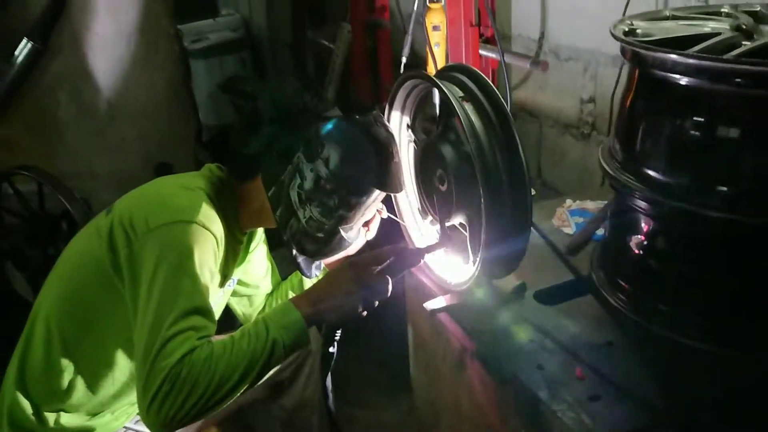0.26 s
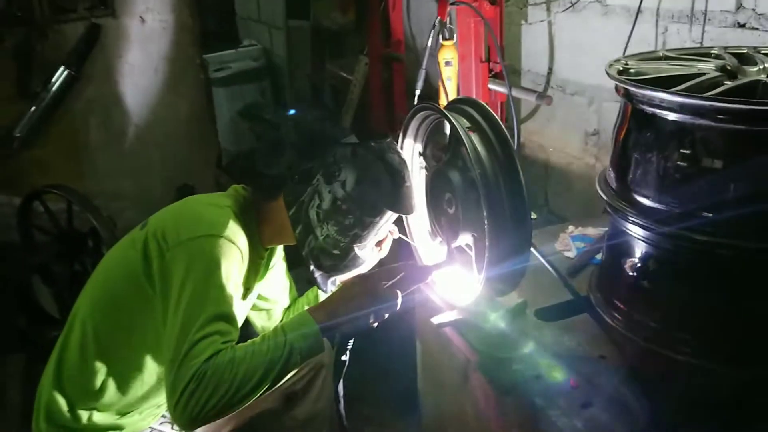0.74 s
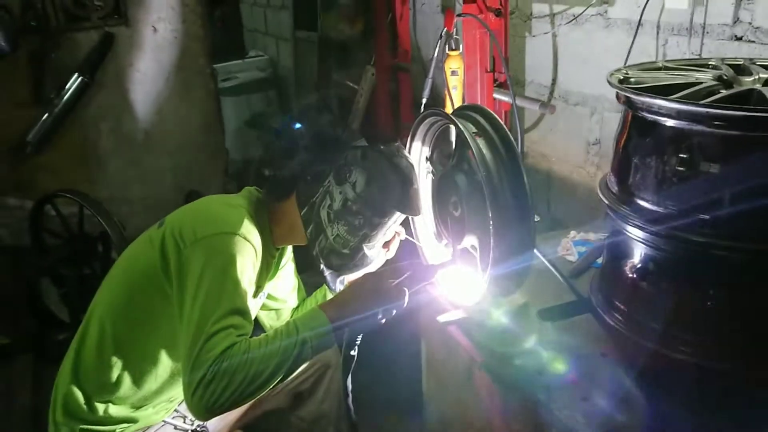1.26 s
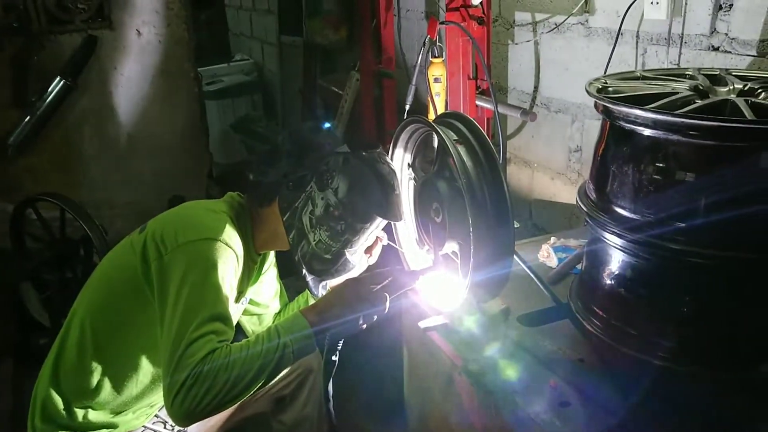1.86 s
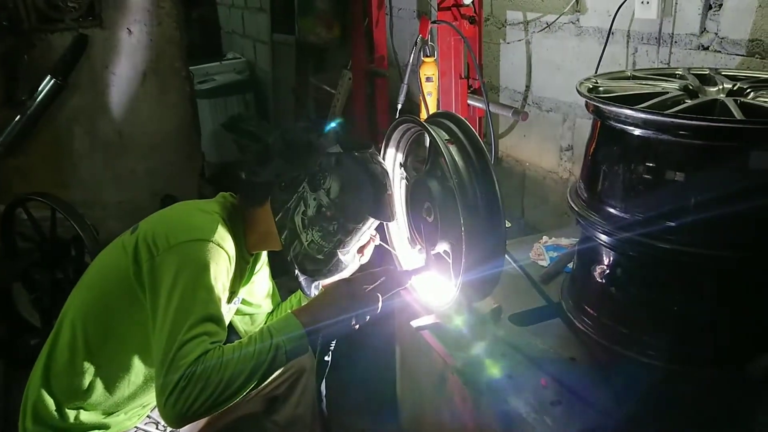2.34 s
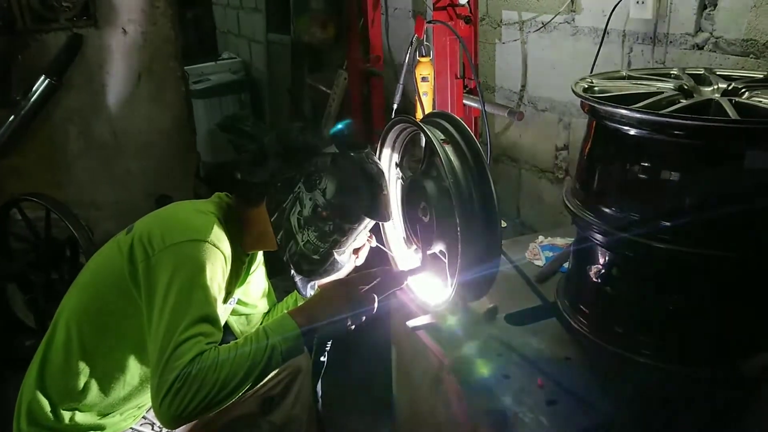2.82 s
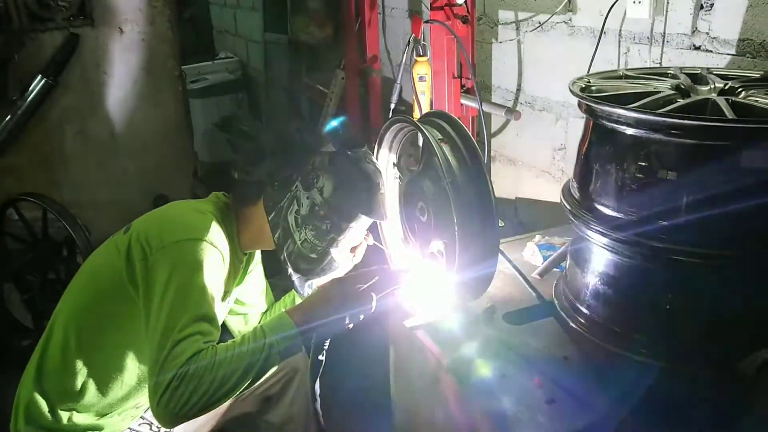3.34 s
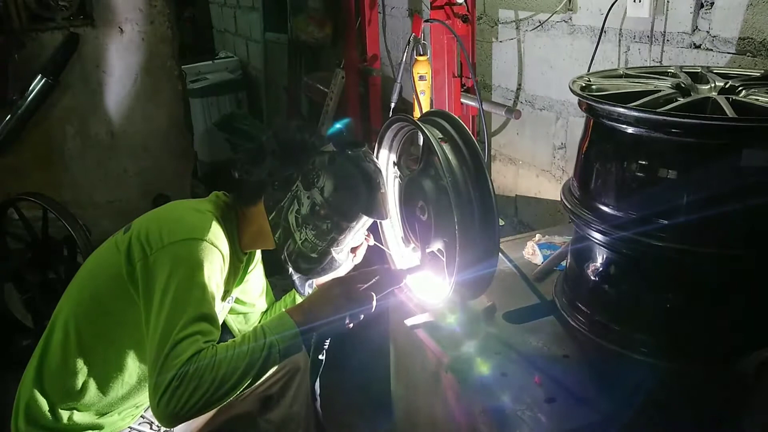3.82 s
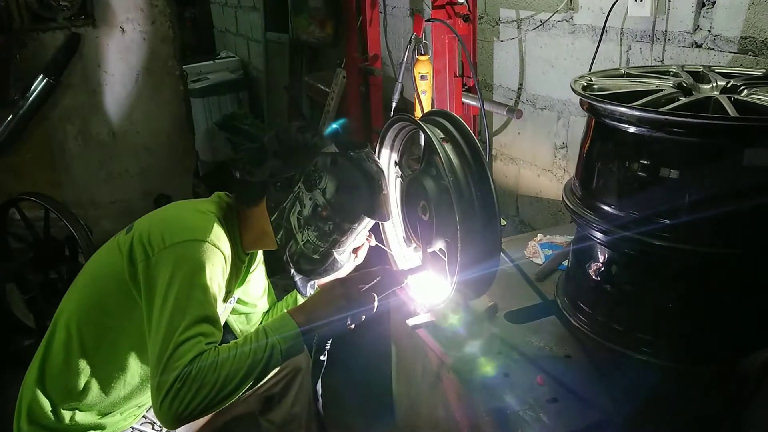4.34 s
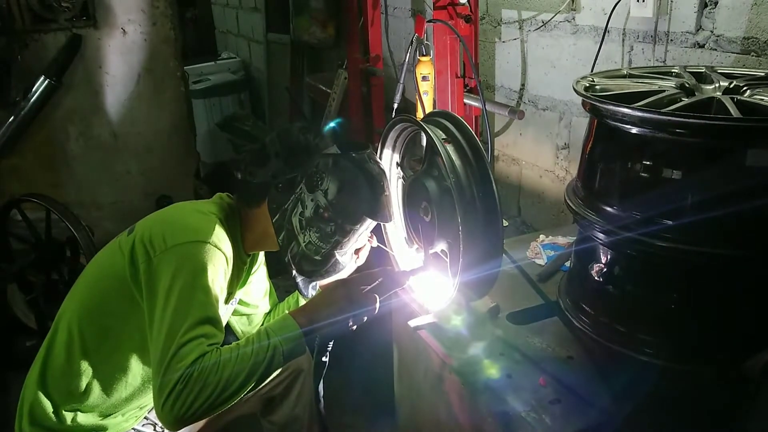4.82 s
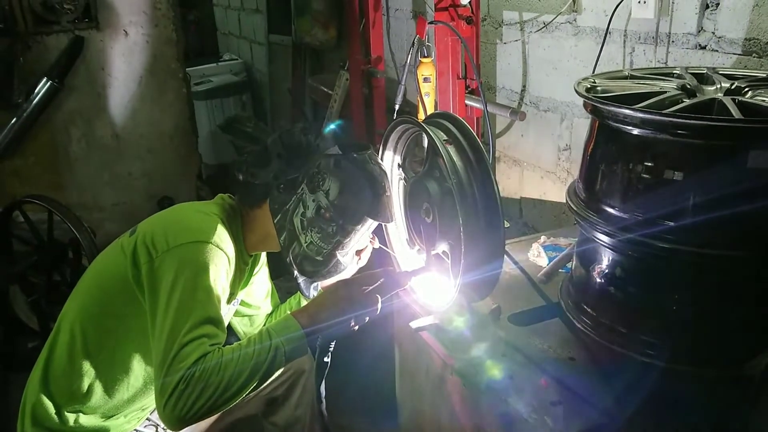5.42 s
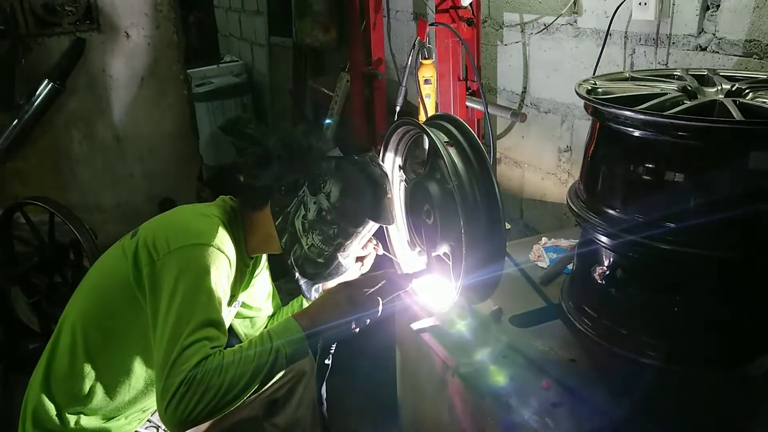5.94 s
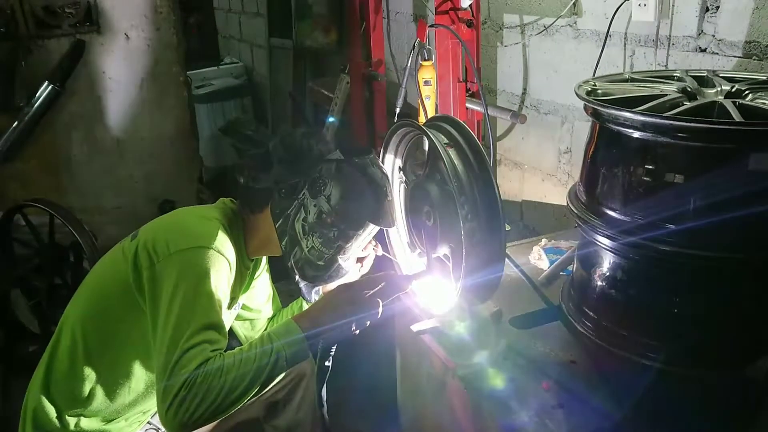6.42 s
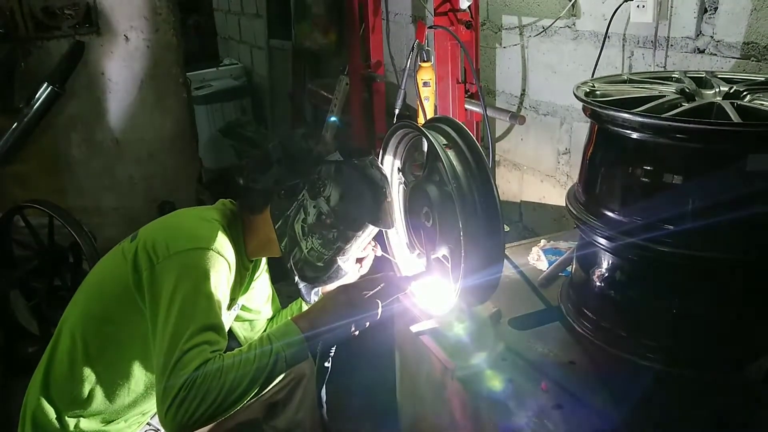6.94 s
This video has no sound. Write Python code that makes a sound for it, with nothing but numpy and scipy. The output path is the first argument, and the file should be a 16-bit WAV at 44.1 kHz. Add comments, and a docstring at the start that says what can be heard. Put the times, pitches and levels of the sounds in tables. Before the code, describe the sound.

Continuous bright electric buzz and gas hiss from welding a wheel rim, interrupted once by a tool clacking down, over low distant engine rumble.

```python
"""A concrete workshop: an alternating-current arc welds a wheel rim, heard on a two-port microphone.
The arc snaps twice in every current cycle; rim and walls turn the snaps into a comb of steady harmonics,
different at each ear, under a hiss of gas and plasma. The microphone is still being moved at first, so
the echo pattern shifts before it settles. Dull knocks on floor and bench; a steel tool, put down once, rings.
Traffic rumbles outside, as noise and engine tones, and a fan hums as narrow bands of noise."""
import sys
import numpy as np
from scipy import signal
from scipy.fft import rfft, irfft, next_fast_len
from scipy.io import wavfile
from scipy.ndimage import uniform_filter1d

SR = 44100
rng = np.random.default_rng(int(sys.argv[2]) if len(sys.argv) > 2 else 0)


def dump(signal):
    """Clip the signal to [-1, 1] and save it as 16-bit WAV at the path in sys.argv[1]."""
    limited = np.clip(np.atleast_2d(signal).T, -1, 1)
    pcm = np.round(limited * 32767).astype(np.int16)
    wavfile.write(sys.argv[1], SR, pcm)


N = 316197

# Arc: current frequency, and the share of a cycle between its two zero crossings
ARC_HZ, SECOND_SNAP = 65.121, .4546
# How the weld burns. Each row: time in seconds, arc gain in dB, hiss level in dB rms.
WELD_LEVELS = [(0, 1, -20), (.55, 1.5, -18), (.8, 7, -12.5), (1.2, 3, -15), (2, 4, -15), (3.1, 0.5, -15.5),
               (3.7, 2.5, -14.5), (3.85, 0.5, -15.5), (4.05, 2.5, -13), (4.5, 0.5, -17), (5.9, 3, -13.5),
               (7.17, 4, -12)]
# Harmonics that rim and walls reinforce.
# Each row: multiple of the arc frequency, left level in dB rms, right level in dB rms, before the arc gain.
STRONG_HARMONICS = [(18, -40, -50), (19, -44, -41), (20, -47, -30), (22, -30, -41), (24, -30, -30),
                    (26, -36, -27), (27, -39, -27), (28, -43, -31), (29, -38, -31), (30, -32, -38),
                    (31, -33, -38), (33, -29, -28), (34, -48, -33), (35, -43, -29), (36, -37, -32),
                    (37, -46, -22), (38, -41, -25), (39, -31, -26), (40, -39, -26), (41, -50, -32),
                    (42, -40, -30), (44, -46, -30), (46, -29, -29), (47, -37, -36), (48, -45, -32),
                    (49, -45, -34), (50, -32, -41), (51, -34, -35), (52, -42, -35), (53, -23, -30),
                    (55, -40, -30), (57, -35, -33), (58, -36, -44), (59, -36, -33), (60, -37, -26),
                    (61, -46, -27), (62, -29, -34), (63, -36, -32), (64, -24, -21), (66, -25, -27),
                    (68, -26, -26), (69, -42, -36), (70, -23, -28), (71, -31, -27), (72, -31, -22),
                    (73, -33, -28), (74, -36, -27), (75, -23, -18), (76, -37, -31), (77, -33, -18),
                    (79, -23, -33), (81, -34, -35), (82, -22, -34), (83, -27, -49), (84, -26, -34),
                    (85, -32, -37), (86, -30, -38), (87, -32, -52), (88, -29, -43), (90, -28, -38),
                    (91, -35, -40), (92, -26, -35), (93, -32, -40), (94, -36, -39), (95, -31, -37),
                    (96, -36, -49), (97, -35, -39), (98, -34, -45), (100, -40, -35), (103, -34, -30),
                    (105, -36, -32), (107, -46, -33), (108, -39, -35), (109, -45, -28), (111, -36, -36),
                    (112, -33, -35), (114, -34, -37), (116, -33, -35), (118, -29, -34), (120, -33, -31),
                    (122, -28, -41), (125, -36, -40), (127, -28, -42), (129, -35, -41), (131, -26, -38),
                    (132, -34, -47), (133, -25, -40), (134, -32, -42), (135, -28, -47), (136, -28, -37),
                    (142, -34, -43), (143, -36, -50), (149, -50, -37), (158, -48, -37), (164, -49, -37),
                    (165, -49, -38), (167, -45, -39), (199, -40, -46), (203, -51, -39), (204, -53, -39),
                    (208, -40, -39), (212, -42, -39), (219, -37, -44), (225, -40, -44)]
# Outline of the weaker harmonics between them, which the echo pattern then scales.
# Each row: frequency in Hz, left level in dB, right level in dB.
WEAK_OUTLINE = [(550, -54.5, -48), (970, -56, -54), (1100, -58, -57), (2100, -46, -46), (5170, -43, -40),
                (6940, -50, -40.5), (8400, -43, -50), (9500, -43, -41), (10700, -50, -47),
                (11600, -51, -54), (12340, -47, -45), (13600, -45, -45), (14600, -42, -47),
                (15500, -49, -53)]
# Rim and bench throw each snap back. Each row: delay in seconds, left level in dB, right level in dB.
SNAP_BOUNCES = [(0, -4.5, 1), (.00035, 4.5, -20), (.0007, -11, -5.5), (.00125, -8, -8.5), (.0019, -7.5, -5),
                (.0045, -1.5, -10)]
# The direct snap and its bounces against the echo cloud. Each row: frequency in Hz, level in dB.
DIRECT_SPECTRUM = [(1000, -13), (3000, -14), (4200, -9), (5300, -5), (6500, 1), (8600, 7), (10000, 4),
                   (11500, -1), (15000, -6)]
# Phase between the two microphone ports. Each row: frequency in Hz, lead of the left in radians.
LEFT_PORT_LEAD = [(1560, -1.4), (1700, -.6), (2150, .1), (2540, -.8), (3000, .8), (3320, 1.8), (3450, 1.3),
                  (3710, -1), (4040, .8), (4170, -1.9), (4300, -1.5), (4430, -3.4), (4560, -2.7),
                  (4623, -.4), (4690, -3.1), (4755, -3.5), (4884, -1.8), (5014, .2), (5144, -2.2),
                  (5340, -2.2), (6000, -1.6), (6750, -2), (8600, -1), (15000, 0)]
# Echo cloud of the room, and the first echoes that crowd in close behind each snap
ECHO_T60_S, SHARED_ECHO = .3, .99   # decay; likeness of the ears below the treble, 0-1
EARLY_DB, EARLY_T60_S = 10.5, .02
# With the microphone at rest: place of the first snap in the cycle, its strength against the second
SETTLED_SNAP_S, SETTLED_FIRST_SHARE = .00707, .9
# Colour of the passing patterns against the settled one.
# Each row: frequency in Hz, left level in dB, right level in dB.
PASSING_COLOUR = [(1300, -11, -4), (1900, -4, -1), (2500, -4, -6), (3300, -3, -1), (3900, -7, -5),
                  (4600, -2, 1), (4980, -6, -9), (5500, -4, -4), (6800, 1, -1), (8500, -4, -5),
                  (12000, 0, 0)]
# The bare snaps, heard past the shifting echoes: bright clicks, the first one weaker
BARE_SNAP_DB, BARE_FIRST_SHARE, BARE_FROM_HZ, BARE_SNAP_S = -1.5, .24, 4900, .0063
# Settling: halfway time, steepness, and the share of shifting pattern that stays, 0-1
SETTLE_S, SETTLE_SHARPNESS, RESTLESS = 1.58, 3.4, .093
# Main resonances of the rim. Each row: frequency in Hz, width in Hz.
RIM_RESONANCES = [(3450, 150), (4900, 330)]
RIM_TURNS_S, RIM_TURN_LENGTH_S = .75, .05   # they come round to the microphone and settle first
FLUTTER_DB, FLUTTER_RATE_HZ, FLUTTER_FROM_HZ = 1.27, 22, 5780   # unsteady level of two treble bands
# Colour of gas and plasma. Each row: frequency in Hz, relative density in dB per Hz.
HISS_SPECTRUM = [(250, -6), (600, -5), (900, -8), (1070, -13), (1250, -8), (1500, -3), (2400, 0),
                 (4500, -2), (7000, -4), (8800, -4), (11000, -9), (12200, -12), (14000, -9), (15600, -9)]

# Knocks on floor and bench.
# Each row: start in seconds, thud level in dB, bench ring in dB, bench pitch ratio, steel ring in dB,
# thud decay t60 in seconds.
KNOCK_EVENTS = [(.39, -18, -40, 1, -40, 0.18), (2.855, -24, -45, 1, -38, .1),
                (3.112, -6, -5, 1.03, -5, 0.12), (3.132, -10, -5, 1, -13, .12),
                (3.150, -16, -9, .86, -26, 0.2), (3.169, -18, -12, .93, -26, .2),
                (3.190, -21, -16, .9, -19, 0.35), (4.015, -17, -40, 1, -40, 0.26),
                (6.27, -15, -40, 1, -40, 0.4)]
# Dull noise of a thud. Each row: frequency in Hz, relative density in dB per Hz.
THUD_SPECTRUM = [(250, -11), (350, -4), (720, -4.5), (950, -5.5), (1300, -3.5), (2500, -4), (5000, -23),
                 (12000, -13)]
# Modes of the bench top, at pitch ratio 1.
# Each row: frequency in Hz, relative level in dB, t60 in seconds, swell time in seconds.
BENCH_MODES = [(345, -16, .12, .003), (520, -14, .1, .003), (760, 0, .14, .002), (900, -3, .09, .006),
               (1055, -11, .07, .004), (1330, -10, .07, .006), (1750, -9, .05, .001)]
# Modes of the steel tool.
# Each row: frequency in Hz, relative level in dB, t60 in seconds, swell time in seconds.
STEEL_MODES = [(5329, 2, .16, .002), (8440, 2, .22, .025), (8783, -3, .2, .003), (8830, -6, .2, .003),
               (9384, -11, .2, .005), (13950, -10, .15, .005), (14020, -7, .18, .005)]
RATTLE_DB, RATTLE_RATE_HZ = 1.5, 60   # unsteady ring as the tool chatters

# Traffic outside. Each row: time in seconds, deep rumble in dB, upper rumble in dB.
TRAFFIC_LEVELS = [(0, -31.5, -35.5), (.5, -29.5, -29), (.88, -21.5, -25), (1.2, -27.5, -26.5),
                  (2.5, -28.5, -31.5), (3.1, -27.5, -29), (4.2, -30.5, -31.5), (4.9, -32.5, -33),
                  (5.4, -29.5, -32.5), (5.9, -29.5, -31.5), (7.17, -29, -28.5)]
# Deep rumble. Each row: frequency in Hz, relative density in dB per Hz.
DEEP_SPECTRUM = [(35, -15), (50, -12), (72, 3.5), (90, -10), (110, -9)]
# Upper rumble. Each row: frequency in Hz, relative density in dB per Hz.
UPPER_SPECTRUM = [(70, -39), (105, -2.5), (155, -3), (210, -5), (300, -12), (400, -59)]
RUMBLE_LUMP_DB, RUMBLE_LUMP_RATE_HZ = 1, 1.2
LORRY_HZ = 52.4   # a lorry passes early on
# Orders of the lorry's note. Each row: multiple of its frequency, relative level in dB.
LORRY_NOTE_ORDERS = [(1, -10), (2, -16), (3, 1), (4, -8.5)]
# Throb of the lorry's note. Each row: time in seconds, level shared by all orders in dB.
LORRY_THROB = [(.1, -45), (.25, -29), (.36, -41), (.49, -22), (.57, -35), (.74, -19), (.98, -33),
               (1.09, -29), (1.25, -48)]
# Engine notes of other vehicles.
# Each row: start in seconds, length in seconds, first pitch in Hz, last pitch in Hz, level in dB.
ENGINE_NOTES = [(1.25, 0.76, 74.9, 74.3, -33.5), (1.4, 0.15, 211, 212, -32.5),
                (1.75, 0.69, 207.3, 210, -37.5), (2.0, 0.71, 106, 109.5, -33),
                (2.41, 2.01, 73.6, 67.9, -30.5), (3.302, 0.8, 105.5, 103.3, -30.5),
                (5.15, 0.53, 106, 103.2, -33), (5.405, 0.3, 75.7, 73.2, -30),
                (5.925, 0.64, 114, 126.3, -27), (6.602, 0.5, 150.3, 154, -30.5)]
NOTE_FADE_S, NOTE_WAVER_DB = .025, 1
# Hum of a cooling fan. Each row: frequency in Hz, width in Hz, level in dB before it leans right.
FAN_RESONANCES = [(405.5, 1.3, -44.5), (581.7, 12, -37)]
LEAN_RIGHT_DB = [[-1.2], [1.2]]   # traffic and fan, left and right
# Noise at the two ears. Each row: frequency in Hz, left-right likeness from 0 to 1.
EAR_LIKENESS = [(60, 0.78), (130, 1), (290, 0.78), (640, 0.41), (1400, 0.28), (3100, 0.12), (15000, 0.034)]

# Recorder: duck threshold, dB of duck per dB above it, onset, fall of the held excess, top of the band
CEILING_DB, SQUEEZE, ATTACK_S, EXCESS_FALL_DB_S, CUTOFF_HZ = -9, .67, .017, 4, 15576


def arc(gain_db, shifting):
    """A settled echo pattern, blended with patterns that come and go while microphone or welder moves."""
    settled = snap_harmonics()
    hz = ARC_HZ * np.arange(1, settled.shape[1] + 1)
    level = abs(settled) * from_db([at_hz(WEAK_OUTLINE, hz, 1), at_hz(WEAK_OUTLINE, hz, 2)])
    for multiple, left_db, right_db in STRONG_HARMONICS:
        level[:, round(multiple) - 1] = from_db([left_db, right_db])
    colour = causal_phase(np.linalg.norm(level, axis=0) / np.linalg.norm(settled, axis=0))
    colour = np.exp(1j * colour / (1 + (hz / 7000) ** 16))   # the treble keeps the shape of the bounces
    steady = play_cycle(level * colour * settled / abs(settled))
    blend = np.sqrt(1 - shifting ** 2) * steady + shifting * passing_patterns(level, hz)
    # within the rim's resonances the settled pattern takes over early
    rim = sum(resonance(steady - blend, rim_hz, width_hz) for rim_hz, width_hz in RIM_RESONANCES)
    turned = 1 / (1 + np.exp((RIM_TURNS_S - np.arange(N) / SR) / RIM_TURN_LENGTH_S))
    return from_db(gain_db) * flutter(blend + turned * rim)


def snap_harmonics(count=240, size=4096, order=12):
    """Harmonics of the two snaps at each ear: a direct click with bounces and a dying cloud of echoes."""
    multiple = np.arange(1, count + 1)
    hz = multiple * ARC_HZ
    shared = SHARED_ECHO / (1 + (hz / 7000) ** 16)   # treble echoes differ between the ears

    age = np.arange(order * size) / size / ARC_HZ
    decay = from_db(-60 * age / ECHO_T60_S) + from_db(EARLY_DB - 60 * age / EARLY_T60_S)
    echoes = rng.standard_normal((3, order * size)) * decay
    wrapped = echoes.reshape(3, order, size).sum(axis=1)   # echoes last into later cycles
    cloud = rfft(wrapped)[:, multiple]
    cloud = np.sqrt(shared) * cloud[2] + np.sqrt(1 - shared) * cloud[:2]
    cloud = cloud / np.sqrt(np.mean(abs(cloud) ** 2))

    bounce = sum(from_db([[left_db], [right_db]]) * np.exp(-2j * np.pi * hz * s)
                 for s, left_db, right_db in SNAP_BOUNCES)
    bounce = np.sqrt(shared) * bounce[1] + np.sqrt(1 - shared) * bounce
    heard = cloud + from_db(at_hz(DIRECT_SPECTRUM, hz)) * bounce / np.sqrt(2)
    heard[0] *= np.exp(1j * at_hz(LEFT_PORT_LEAD, hz))
    snaps = SETTLED_FIRST_SHARE + np.exp(-2j * np.pi * multiple * SECOND_SNAP)
    return heard * snaps * np.exp(-2j * np.pi * hz * SETTLED_SNAP_S) / 1.76


def passing_patterns(level, hz):
    """Seven echo patterns drift in and out past the bare snaps, as heard from a moving microphone."""
    outline = np.sqrt(uniform_filter1d(level ** 2, size=21))
    outline = outline / (1 + (1250 / hz) ** 8)   # little buzz below the rim's range
    outline = outline * from_db([at_hz(PASSING_COLOUR, hz, 1), at_hz(PASSING_COLOUR, hz, 2)])
    weights = np.array([drift(3.1) for k in range(7)])
    weights /= np.sqrt(np.sum(weights ** 2, axis=0))   # the colour shifts, the loudness stays
    passing = 0
    for weight in weights:   # each pattern arrives with a delay of its own
        pattern = snap_harmonics() * np.exp(-2j * np.pi * rng.random() * hz / ARC_HZ)
        pattern = pattern / np.sqrt(uniform_filter1d(abs(pattern) ** 2, size=25))
        passing = passing + weight * play_cycle(outline * pattern)
    bare = BARE_FIRST_SHARE + np.exp(-2j * np.pi * SECOND_SNAP * hz / ARC_HZ)
    bare = bare * np.exp(-2j * np.pi * hz * BARE_SNAP_S)
    bare = bare / (1 - 1j * BARE_FROM_HZ / hz) ** 2   # sharp clicks without their lows
    return passing + from_db(BARE_SNAP_DB) * play_cycle(outline * bare)


def play_cycle(harmonics, size=8192):
    """Repeat one cycle, given by the rms of its harmonics, at the arc frequency."""
    cycle = irfft(np.pad(harmonics, ((0, 0), (1, 0))), size) * size / np.sqrt(2)
    place = np.arange(N) * ARC_HZ / SR % 1 * size
    return np.array([np.interp(place, np.arange(size + 1), np.append(c, c[0])) for c in cycle])


def causal_phase(gain, size=512):
    """Phase of the minimum-phase filter with these harmonic gains: it rings after a snap, never before."""
    log_gain = np.log(np.pad(gain, (1, size // 2 - len(gain)), mode="edge"))
    fold = np.r_[1, np.full(size // 2 - 1, 2), 1, np.zeros(size // 2 - 1)]
    return rfft(irfft(log_gain, size) * fold).imag[1:len(gain) + 1]


def flutter(x):
    """Each of two treble bands has an unsteady level of its own."""
    out = x
    for low_hz in FLUTTER_FROM_HZ * 1.6 ** np.arange(2):
        band_filter = signal.butter(1, [low_hz, low_hz * 1.6], "band", fs=SR, output="sos")
        band = signal.sosfilt(band_filter, x)
        out = out + (from_db(FLUTTER_DB * drift(FLUTTER_RATE_HZ)) - 1) * band
    return out


def hiss(level_db):
    """Shielding gas and plasma: coloured noise that swells a little after each snap."""
    turn = 2 * np.pi * ARC_HZ * np.arange(N) / SR
    swell_db = 1.74 * np.cos(2 * turn - .8)
    return from_db(level_db + swell_db + 1.63 * drift(13.3)) * coloured_noise(HISS_SPECTRUM)


def knocks():
    """Dying bursts of dull noise; bench and steel modes ring on top, their phases apart at the two ears."""
    t, thud, out = np.arange(N) / SR, coloured_noise(THUD_SPECTRUM), np.zeros((2, N))
    places = rng.uniform(0, 4.7, (len(STEEL_MODES), 2, 1))
    rattle = from_db(RATTLE_DB * drift(RATTLE_RATE_HZ))
    for s, thud_db, bench_db, pitch, steel_db, t60 in KNOCK_EVENTS:
        age = np.maximum(t - s, 0)
        out += (1 - np.exp(-age / .002)) * from_db(thud_db - 60 * age / t60) * thud
        near = slice(round(s * SR), round(s * SR) + SR // 2)   # each ring is kept for half a second
        rings = [(BENCH_MODES, bench_db, .3, pitch), (STEEL_MODES, steel_db, .6, 1)]
        for modes, ring_db, spread, ratio in rings:
            for (hz, mode_db, mode_t60, swell_s), place in zip(modes, places):
                decay = from_db(ring_db + mode_db - 60 * age[near] / mode_t60)
                rise = 1 - np.exp(-age[near] / swell_s)
                wave = np.sin(2 * np.pi * hz * ratio * t[near] + spread * place)
                out[:, near] += rattle[near] * rise * decay * wave
    return out


def traffic():
    """Two bands of lumpy rumble and the engine notes outside, a little louder on the right."""
    deep_db, upper_db = in_time(TRAFFIC_LEVELS)
    rumble = 0
    for db, spectrum in [(deep_db, DEEP_SPECTRUM), (upper_db, UPPER_SPECTRUM)]:
        lumps_db = RUMBLE_LUMP_DB * drift(RUMBLE_LUMP_RATE_HZ)
        rumble = rumble + from_db(db + lumps_db) * coloured_noise(spectrum)
    return (rumble + engines()) * from_db(LEAN_RIGHT_DB)


def engines():
    """The lorry's orders share one throbbing level; the other notes glide evenly, fade in and out, waver."""
    t = np.arange(N) / SR
    throb_db, = in_time(LORRY_THROB)
    lorry = sum(from_db(db) * tone(np.full(N, LORRY_HZ * k)) for k, db in LORRY_NOTE_ORDERS)
    out = from_db(throb_db) * lorry
    waver_db = NOTE_WAVER_DB * drift(1.9)
    for s, length, first_hz, last_hz, db in ENGINE_NOTES:
        fade = np.clip(np.minimum(t - s, s + length - t) / NOTE_FADE_S, 0, 1)
        glide_hz = np.interp(t, [s, s + length], [first_hz, last_hz])
        out = out + fade * from_db(db + waver_db) * tone(glide_hz)
    return out


def fan():
    """Blade hum: noise in narrow resonances, a little louder on the right."""
    hum = sum(from_db(db) * rms_one(resonance(rng.standard_normal(N), hz, width_hz))
              for hz, width_hz, db in FAN_RESONANCES)
    return hum * from_db(LEAN_RIGHT_DB)


def coloured_noise(spectrum):
    """Stereo noise of rms 1 with a given spectrum and a left-right likeness by frequency."""
    size = next_fast_len(N)
    hz = np.maximum(np.arange(size // 2 + 1) * SR / size, 1)
    mid, side = rfft(rng.standard_normal((2, size)))
    alike = np.clip(at_hz(EAR_LIKENESS, hz), 0, 1)
    inside = (hz > spectrum[0][0]) & (hz < spectrum[-1][0] * 1.1)
    pair = np.sqrt(1 + alike) * mid + np.sqrt(1 - alike) * side * [[1], [-1]]
    return rms_one(irfft(pair * from_db(at_hz(spectrum, hz)) * inside, size)[:, :N])


def resonance(x, hz, width_hz):
    """A two-pole peak of gain about 1."""
    r = np.exp(-np.pi * width_hz / SR)
    poles = [1, -2 * r * np.cos(2 * np.pi * hz / SR), r * r]
    return signal.lfilter(np.array([1, 0, -1]) * (1 - r * r) / 2, poles, x)


def tone(hz):
    """A sine of rms 1 that follows a pitch given for each sample."""
    return np.sqrt(2) * np.sin(2 * np.pi * np.cumsum(hz) / SR)


def drift(rate_hz):
    """Random wandering of rms 1: noise through two equal low-pass poles, drawn every 40 samples."""
    r = np.exp(-80 * np.pi * rate_hz / SR)
    slow = signal.lfilter([1], [1, -2 * r, r * r], rng.standard_normal(N // 40 + 2002))
    slow = slow[2000:]   # skip the filter's start
    return np.interp(np.arange(N) / 40, np.arange(len(slow)), rms_one(slow))


def from_db(db):
    """Decibels to gain."""
    return 10 ** (np.asarray(db) / 20)


def rms_one(x):
    """Scale to rms 1."""
    return x / np.sqrt(np.mean(x ** 2) + 1e-20)


def in_time(rows):
    """Columns of a curve table, one value a sample."""
    s, *columns = np.transpose(rows)
    return [np.interp(np.arange(N) / SR, s, c) for c in columns]


def at_hz(points, hz, column=1):
    """Read a column of a spectrum table on a log-frequency axis."""
    points = np.array(points)
    return np.interp(np.log(hz), np.log(points[:, 0]), points[:, column])


def scene():
    """Arc, hiss, knocks, traffic and fan; the echo pattern settles as the microphone comes to rest."""
    gain_db, hiss_db = in_time(WELD_LEVELS)
    moving = 1 / (1 + (np.arange(N) / SR / SETTLE_S) ** SETTLE_SHARPNESS)
    shifting = RESTLESS + (1 - RESTLESS) * moving
    return arc(gain_db, shifting) + hiss(hiss_db) + knocks() + traffic() + fan()


def record(dry):
    """Gain control ducks after loud moments and recovers steadily; peaks clip; the top is cut."""
    power = uniform_filter1d(np.mean(dry ** 2, axis=0), size=1354, origin=600)   # mostly the last 30 ms
    excess_db = np.maximum(10 * np.log10(power + 1e-12) - CEILING_DB, 0)
    climb = EXCESS_FALL_DB_S * np.arange(N) / SR
    held_db = np.maximum.accumulate(excess_db + climb) - climb   # holds each peak, falling steadily
    r = np.exp(-1 / (ATTACK_S * SR))
    duck_db = SQUEEZE * signal.lfilter([1 - r], [1, -r], held_db)
    clipped = np.clip(dry * from_db(-duck_db), -.92, .92)
    cut = signal.ellip(12, .5, 60, CUTOFF_HZ, fs=SR, output="sos")
    return np.clip(signal.sosfilt(cut, clipped), -1, 1)


dry = scene()
out = record(dry)
dump(out)
```